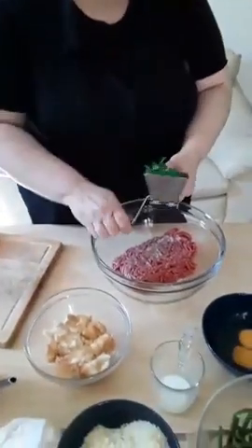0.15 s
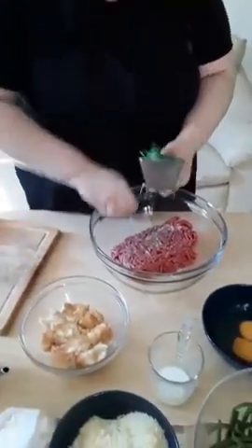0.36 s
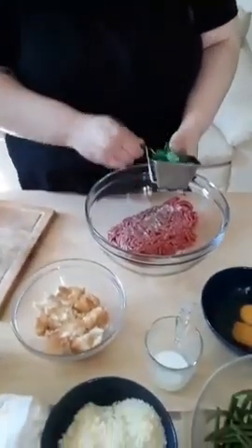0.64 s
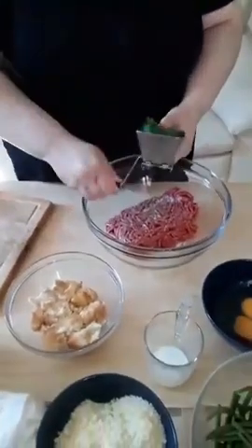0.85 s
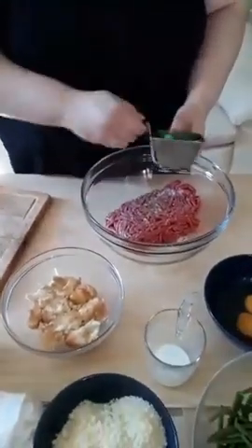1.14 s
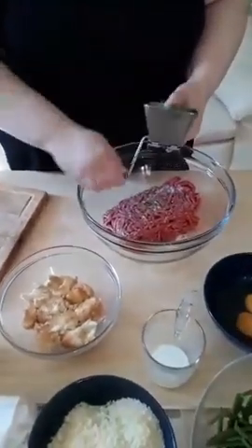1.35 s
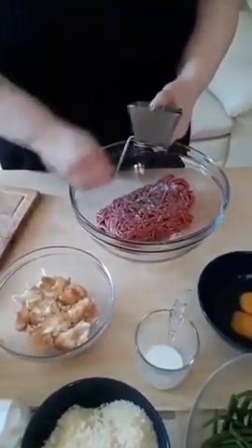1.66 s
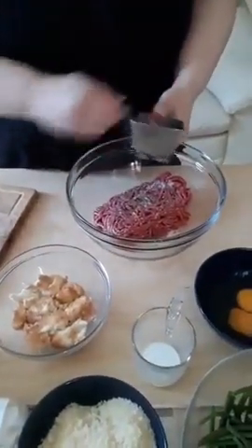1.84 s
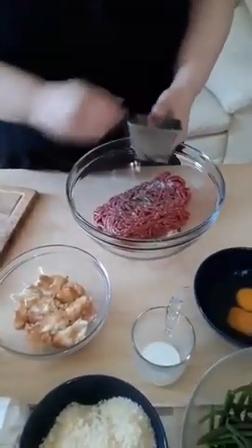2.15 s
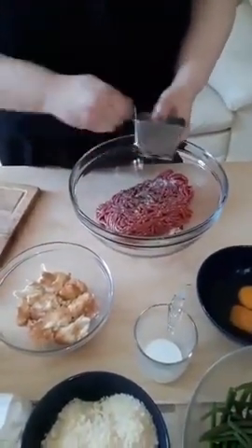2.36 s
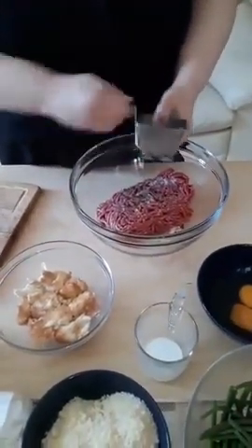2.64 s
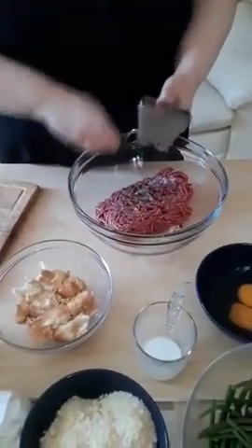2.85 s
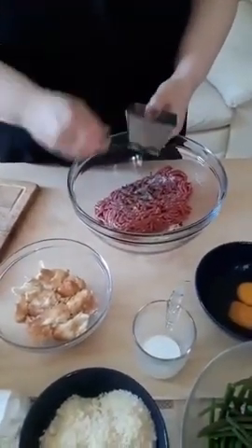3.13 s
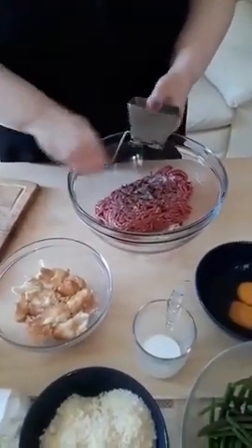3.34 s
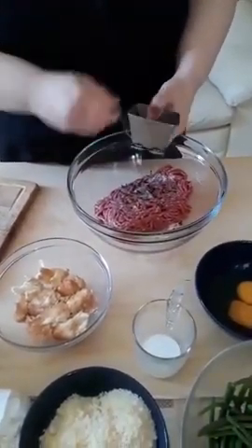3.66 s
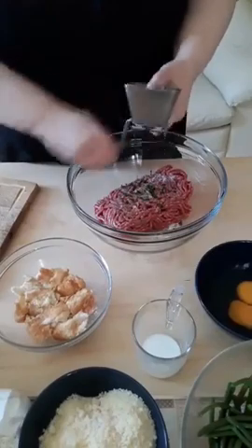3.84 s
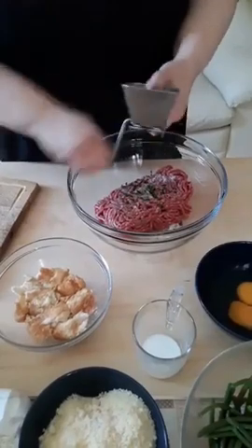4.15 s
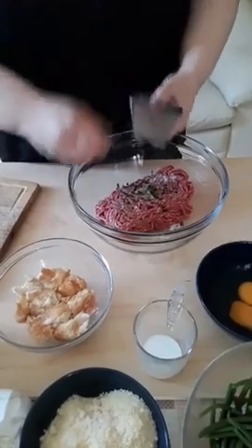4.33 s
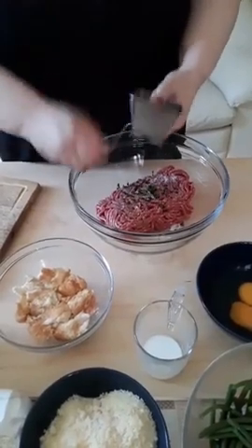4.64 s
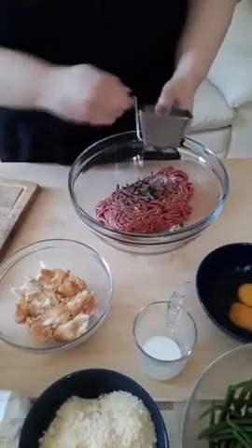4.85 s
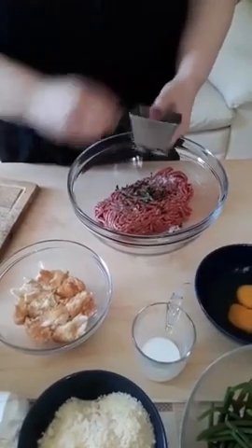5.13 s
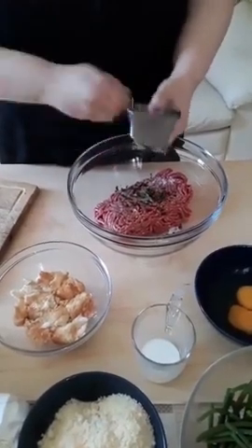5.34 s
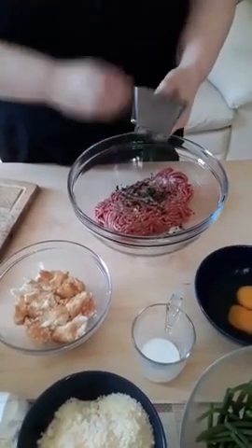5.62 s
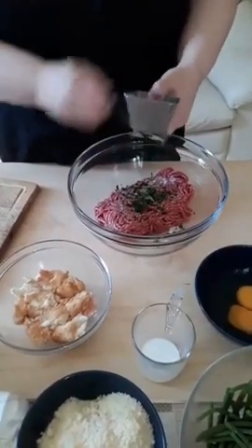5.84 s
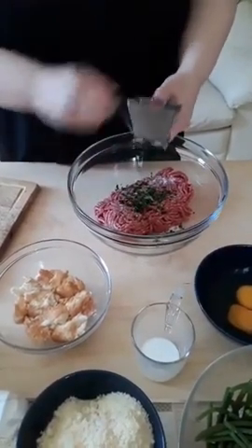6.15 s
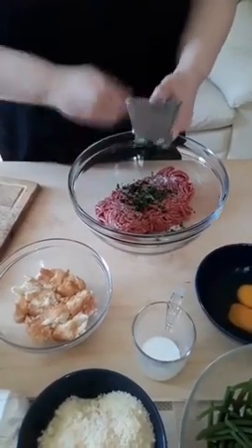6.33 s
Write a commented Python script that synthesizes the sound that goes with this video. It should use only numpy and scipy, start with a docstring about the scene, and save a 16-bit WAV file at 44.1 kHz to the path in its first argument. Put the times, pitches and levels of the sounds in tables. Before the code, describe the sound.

A small steel herb mill is cranked quickly over a glass bowl, tearing wet parsley with a crisp, grainy scrape that pulses with each turn. Stalks snap and the blades click irregularly against the metal, ringing briefly. A few harder knocks make the bowl clunk on the table. The shredding thins near the end. It sounds close, in a slightly echoing kitchen with faint hum and hiss.

```python
"""Wet parsley tears and scrapes in dense grains, over a low rumble of handling: a small steel herb mill
is being cranked above a glass bowl. Its blades catch and knock against the hopper (the cup that holds
the leaves), the steel rings and stalks snap. The heaviest knocks jolt the bowl on the table.
The hard kitchen walls ring after each knock, and a faint hum and hiss lie under it all."""
import sys
import numpy as np
from scipy import signal
from scipy.fft import rfft, irfft, next_fast_len
from scipy.io import wavfile

SR = 44100
rng = np.random.default_rng(int(sys.argv[2]) if len(sys.argv) > 2 else 0)


def inscribe(sig):
    """Save sig as 16-bit PCM at rate SR to the path in sys.argv[1].

    A 1-D sig is mono; a 2-D sig holds one channel per row.
    Samples are clipped to [-1, 1] before scaling.
    """
    pcm = np.round(np.clip(np.atleast_2d(sig).T, -1, 1) * 32767)
    wavfile.write(sys.argv[1], SR, pcm.astype(np.int16))


N = 286164

# Levels in a table are relative to each other. A "colour" says how strong each frequency is.
# how loudly the table booms under the work: t/s, level/dB
TABLE_BOOM = [(0, -54), (1.2, -59), (1.7, -59), (1.93, -53), (2.2, -58), (2.55, -60.5), (2.9, -87),
              (3.4, -63), (6.49, -65.5)]
# colours of that boom and of the rubbing grip: f/Hz, level/dB
BOOM_COLOUR = [(20, -38), (50, -26), (76, -5), (95, -11.5), (120, -3), (136, 2.5), (156, -9.5), (250, -13),
               (400, -22.5), (800, -38), (3000, -63)]
GRIP_COLOUR = [(150, -21), (350, -2), (550, -5), (820, -6), (1100, -9.5), (2000, -24), (6000, -32)]
# colours of the room's hum and hiss: f/Hz, level/dB
HUM_COLOUR = [(20, -18), (40, -9), (58, -6), (76, 1), (98, -8.5), (135, 0.5), (190, -6.5), (380, -6.5),
              (520, -18.5), (1000, -27), (3000, -53)]
HISS_COLOUR = [(120, -16), (200, -14), (1040, -2), (1980, 10.5), (3150, -2), (3690, 1), (5960, -17),
               (8210, -15), (14000, -23)]
# how hard the blades bite into the leaves: t/s, level/dB
BITE = [(0.0, -30), (0.12, -41.5), (0.33, -48), (0.5, -38.5), (0.65, -45), (0.82, -38.5), (1.5, -41.5),
        (2.42, -41.5), (2.58, -46.5), (3.01, -39.5), (3.08, -50), (3.15, -39), (3.4, -42.5), (4.35, -41.5),
        (5.25, -44.5), (5.5, -52), (6.22, -56), (6.49, -44.5)]
# colour of leaves tearing in the hopper: f/Hz, level/dB
LEAF_COLOUR = [(410, -40), (700, -21.5), (1060, -24), (1430, -13), (1640, -11), (1750, -21), (2010, -8.5),
               (2680, -19.5), (2960, -16.5), (3710, -12), (4820, -12.5), (6520, -9), (8170, 2.5),
               (10100, -11.5), (14000, -21)]
# how long the room rings: f/Hz, time to fade by 60 dB/s
ROOM_FADE = [(100, 0.24), (500, 0.68), (2000, 0.69), (5000, 0.69), (8000, 0.47), (14000, 0.37)]
# blades knock in the hopper (the row at 2.007 s is a stalk snapping sharply, with little echo): t/s, crack
# level/dB, wall ring level/dB, blade ring level/dB, blade f/Hz
KNOCKS = [(0.1143, -26.5, -37, -27.5, 7660), (0.3815, -22, -33.5, -18.5, 7250),
          (0.402, -18.5, -31.5, -21, 8340), (0.421, -22.5, -27, -21.5, 7950), (0.9754, -21, -35, -25, 8400),
          (0.9886, -28, -23.5, -19.5, 7500), (1.0461, -16, -24.5, -20, 7850),
          (1.4394, -23, -30.5, -20, 8200), (1.475, -17.5, -28.5, -17.5, 7730), (1.771, -24, -32, -23, 8100),
          (1.7797, -25.5, -25.5, -24, 7300), (1.8005, -27, -42, -35, 7800), (2.0074, -29.5, -48, -33, 7900),
          (2.0624, -26, -33, -20.5, 7600), (2.1074, -15, -25.5, -20, 8000),
          (2.375, -23.5, -31.5, -36, 7950), (2.6418, -17, -22, -12.5, 7750),
          (3.9187, -29.5, -34, -19.5, 7300), (4.2308, -25, -35.5, -18.5, 7240),
          (4.2547, -34.5, -39, -27, 8300), (4.5039, -28, -35, -21, 7360), (4.798, -27.5, -31, -25.5, 7600),
          (5.102, -19, -19, -17, 7920), (5.3385, -27, -28.5, -20.5, 7360), (6.113, -33.5, -36, -32.5, 7700),
          (6.2084, -40, -37, -48, 7800), (6.2699, -35, -48, -24.5, 7970)]
# colour of a knock's crack: f/Hz, level/dB
CRACK_COLOUR = [(60, -29), (500, -21.5), (900, -14.5), (1250, -3), (1700, -2.5), (2550, -1), (3000, 2.5),
                (3300, -0.5), (3750, 2.5), (5200, -1.5), (6500, 4.5), (9500, -1), (11000, -6), (14500, -12)]
# lingering tones of the steel: f/Hz, level/dB, time to fade by 60 dB/s
STEEL_TONES = [(1213, -35.5, 0.66), (1706, -29.5, 0.55), (1845, -44, 0.22), (2017, -21.5, 0.19),
               (3060, -22.5, .2), (3650, -21.5, 0.19), (3820, -34, 0.26), (4900, -20, 0.079),
               (6530, -40, 0.18), (6670, -26.5, 0.16), (7510, -16, 0.12), (8000, -43, 0.23),
               (10485, -45, .22), (13200, -47, 0.5)]
# the thickest stalks snap: t/s, level/dB
THICK_SNAPS = [(0.3602, -32.5), (0.5387, -28), (2.529, -29.5), (3.3565, -29.5), (4.0085, -34), (4.432, -32),
               (4.945, -26.5), (5.58, -39), (5.7836, -39), (5.8436, -41), (5.878, -36.5), (6.359, -36)]
# a wad of leaves drags through the mill's comb: middle t/s, half length/s, level/dB
DRAGS = [(0.373, 0.0093, -35), (0.951, 0.019, -31), (1.203, 0.036, -34.5), (2.869, 0.012, -40.5),
         (3.177, 0.052, -37.5), (3.399, 0.019, -30), (3.541, 0.037, -37), (3.684, 0.038, -38.5),
         (4.667, 0.013, -34), (5.085, 0.0098, -29)]
# the heaviest knocks jolt the mill against the bowl: t/s, thump level/dB, clunk level/dB
JOLTS = [(1.046, -50, -43), (1.475, -36.5, -44), (2.108, -59, -30.5), (2.642, -37.5, -29.5),
         (5.103, -62, -31.5)]
# colours of the table's thump and of the bowl's clunk on it: f/Hz, level/dB
THUMP_COLOUR = [(25, -2), (60, -5), (125, 0), (200, -3), (400, -5.5), (800, -17), (4000, -54)]
CLUNK_COLOUR = [(200, -21.5), (520, -9), (660, 2.5), (830, -12.5), (1020, -0.5), (1210, 10), (1330, -2),
                (1460, -4.5), (2500, 1.5), (6000, -57)]


def from_db(db):
    """Turn decibels into a number to multiply by."""
    return 10 ** (np.asarray(db) / 20)


def unit_power(x):
    """Scale a signal to an average power of 1."""
    return x / np.sqrt(np.mean(x ** 2) + 1e-20)


def burst(x):
    """Give a short sound the energy of 4 ms at power 1."""
    return x / np.sqrt(np.sum(x ** 2) / (.004 * SR))


def in_time(rows):
    """Join (t/s, value) points into a curve with a value at every sample."""
    return np.interp(np.arange(N) / SR, *np.transpose(rows))


def at_hz(points, hz):
    """Read between (f/Hz, value) points, with octaves evenly spaced."""
    known_hz, values = np.transpose(points)
    return np.interp(np.log(np.maximum(hz, 1)), np.log(known_hz), values)


def coloured(x, colour):
    """Filter a sound to give it a colour."""
    size = 2 * next_fast_len(len(x))
    gains = from_db(at_hz(colour, np.arange(size // 2 + 1) * SR / size))
    cepstrum = irfft(np.log(gains))
    # fold it in half, so the filter never rings before the sound arrives (minimum phase)
    cepstrum[1:size // 2] *= 2
    cepstrum[size // 2 + 1:] = 0
    return irfft(rfft(x, size) * np.exp(rfft(cepstrum)))[:len(x)]


def resonance(x, hz, width_hz):
    """Let a sound ring around one frequency; a narrower width rings longer."""
    r = np.exp(-np.pi * width_hz / SR)
    feedback = [1, -2 * r * np.cos(2 * np.pi * hz / SR), r * r]
    return signal.lfilter(np.array([1, 0, -1]) * (1 - r * r) / 2, feedback, x + 1e-18)


def noise(colour):
    """Steady coloured noise of power 1."""
    return unit_power(coloured(rng.standard_normal(N), colour))


def drift(per_s):
    """A random curve of power 1 that heads for a new value per_s times a second."""
    points = rng.standard_normal(N // 10)
    return unit_power(np.interp(np.arange(N) / SR * per_s, np.arange(len(points)), points))


def chatter(rise_s):
    """A rush of tiny impacts that swells and dies within milliseconds."""
    t = np.arange(SR // 20) / SR
    return rng.standard_normal(len(t)) * t / rise_s * np.exp(-t / rise_s)


def add(track, s, sound):
    """Mix a sound into a track, starting s seconds in."""
    start = int(np.clip(round(s * SR), 0, N - 1))
    track[start:start + len(sound)] += sound[:N - start]


def bite_db(turn_s=.2995, first_slack_s=0.004, swing_db=2):
    """The crank turns steadily; the bite of the blades swells and slackens once a turn."""
    turns = (np.arange(N) / SR - first_slack_s) / turn_s
    return in_time(BITE) - swing_db * np.cos(2 * np.pi * turns)


def shredding(level_db, grains_per_s, size_db, clump_db, hiss_db, drag_db):
    """Leaf cells burst in clumps, more often in a hard bite, over the blades' scrape; wads rasp."""
    effort = from_db(bite_db() + level_db)
    pops = rng.random(N) < grains_per_s / SR * np.sqrt(unit_power(effort))
    sizes = from_db(size_db * np.minimum(rng.exponential(1, N), 3)) * rng.choice([-1, 1], N)
    grains = unit_power(pops * sizes) + from_db(hiss_db) * rng.standard_normal(N)
    clumps = unit_power(from_db(clump_db * np.tanh(drift(per_s=190))))
    rasp = from_db(drag_db) * wad_drag() * rng.standard_normal(N)
    return clumps * (effort * unit_power(grains) + rasp)


def hopper(x, wall_db, flutter_db):
    """The leaves sound through the hopper, whose wall answers unevenly as the blades rub it."""
    wall = from_db(wall_db + flutter_db * drift(per_s=25)) * resonance(x, hz=2030, width_hz=150)
    colour_gain = np.linalg.norm(coloured(signal.unit_impulse(SR // 10), LEAF_COLOUR))
    return coloured(x + wall, LEAF_COLOUR) / colour_gain


def wall_scrape(drag_db, turn_db):
    """A wad, or the height of a turn, presses the blades against the hopper wall, which sings roughly."""
    rubbed = resonance(rng.standard_normal(N), hz=2050, width_hz=190)
    rubbed = resonance(rubbed, hz=1960, width_hz=650)
    pressure = from_db(drag_db) * wad_drag() + from_db(turn_db + bite_db())
    return pressure * unit_power(rubbed)


def handling(waver_db, slip_s, slip_db, slip_rise_s, slip_fade_s):
    """The table booms unevenly under the work; the grip rubs along with it and slips once."""
    boom_db = in_time(TABLE_BOOM) + waver_db * drift(per_s=9.2)
    grip = from_db(-63.5 + 0.47 * (boom_db + 63))   # follows about half of the boom's swing in dB
    since = np.arange(N) / SR - slip_s
    slip = np.clip(1 + since / slip_rise_s, 0, 1) * np.exp(-np.maximum(since, 0) / slip_fade_s)
    rub = np.hypot(grip, from_db(slip_db) * slip)
    return from_db(boom_db) * noise(BOOM_COLOUR) + rub * noise(GRIP_COLOUR)


def background(hum_db, hiss_db):
    """The room hums and hisses faintly and steadily."""
    return from_db(hum_db) * noise(HUM_COLOUR) + from_db(hiss_db) * noise(HISS_COLOUR)


def table_echo(x, delay_s, echo_db):
    """The table top throws back one quick echo."""
    return x + from_db(echo_db) * np.pad(x, (int(delay_s * SR), 0))[:N]


def kitchen(x, first_echo_s, build_s):
    """Dense wall echoes build up and fade octave by octave; their pattern changes as the mill moves."""
    out, t, hz = np.zeros(N), np.arange(SR) / SR, np.arange(SR // 2 + 1)
    octave = np.round(np.log2(np.maximum(hz, 125) / 125))
    fades = {k: from_db(-60 * t / at_hz(ROOM_FADE, 125 * 2 ** k)) for k in np.unique(octave)}
    for start in range(0, N, SR // 2):   # a new pattern every half second
        white = rfft(rng.standard_normal(SR))
        tail = sum(irfft(white * (octave == k), SR) * fade for k, fade in fades.items())
        tail *= np.clip((t - first_echo_s) / build_s, 0, 1)
        add(out, start / SR, signal.fftconvolve(x[start:start + SR // 2], tail / np.linalg.norm(tail)))
    return out


def knocks(rise_s, early_s, wall_db, crack_db, blade_db, wall_to_room_db):
    """Each knock cracks and briefly rings the blades and the hand-damped wall; gives (direct, to_room)."""
    direct, to_room = np.zeros(N), np.zeros(N)
    # the thin steel sends little of a crack's bass straight ahead
    bass_cut = signal.butter(2, 1860, "high", fs=SR, output="sos")
    for s, crack, wall, blade, blade_hz in KNOCKS:
        wall_hz = rng.normal(2012, 35)   # the wall's pitch shifts a little with the grip

        def struck(force, wall_gain):
            """Wall, blades and crack all answer the same push."""
            wall_ring = resonance(resonance(force, wall_hz, width_hz=230), wall_hz, width_hz=430)
            blade_ring = resonance(resonance(force, blade_hz, width_hz=1000), blade_hz, width_hz=3400)
            return (wall_gain * from_db(wall + wall_db) * burst(wall_ring)
                    + from_db(blade + blade_db) * burst(blade_ring)
                    + from_db(crack + crack_db) * burst(coloured(force, CRACK_COLOUR)))
        add(direct, s - early_s, struck(signal.sosfilt(bass_cut, chatter(rise_s)), wall_gain=0.96))
        # the wall sounds in all directions, so the more it rings, the more reaches the room
        room_gain = from_db(0.2943 * (wall + 32))
        # the room gathers sound from all sides, which evens the chatter out into a clean click
        click = signal.unit_impulse(SR // 20)
        add(to_room, s, room_gain * struck(click, wall_gain=from_db(wall_to_room_db)))
    return direct, to_room


def steel_ring(level_db, spread_db, nearly_empty_s, empty_boost_db):
    """The steel rings on after a knock, louder for a hard crack and once few leaves are left to damp it."""
    out, t = np.zeros(N), np.arange(SR // 2) / SR
    tones = np.array([from_db(db - 60 * t / fade_s) * np.sin(2 * np.pi * hz * t)
                      for hz, db, fade_s in STEEL_TONES])
    for s, crack, *_ in KNOCKS:
        ring_db = crack + level_db + empty_boost_db * (s > nearly_empty_s)
        strengths = from_db(ring_db + rng.normal(0, spread_db, len(tones)))
        add(out, s, strengths @ tones)
    return out


def stalk_snaps(level_db, rise_s, thin_per_s, thin_db, spread_db):
    """A stalk breaks with one tick; thin ones break at random, louder when the blades bite harder."""
    out = np.zeros(N)
    thin_starts = np.flatnonzero(rng.random(N) < thin_per_s / SR)
    thin_levels = bite_db() + thin_db + spread_db * rng.standard_normal(N)
    thin_snaps = [(i / SR, thin_levels[i]) for i in thin_starts]
    ticks = [burst(chatter(rise_s)) for _ in THICK_SNAPS]
    for k, (s, db) in enumerate(THICK_SNAPS + thin_snaps):
        add(out, s, from_db(db + level_db) * ticks[k % len(ticks)])
    return out


def wad_drag():
    """The drag of each wad of leaves swells and fades as it passes the comb."""
    t = np.arange(N) / SR
    return sum(from_db(db) * np.exp(-2 * ((t - s) / half_s) ** 2) for s, half_s, db in DRAGS)


def bowl_jolts(thump_to_room_db, clunk_to_room_db):
    """The jolted bowl clunks and the table under it thumps; gives (direct, to_room)."""
    direct, to_room, click = np.zeros(N), np.zeros(N), signal.unit_impulse(SR // 10)
    thump = burst(coloured(resonance(click, hz=135, width_hz=430), THUMP_COLOUR))
    clunk = burst(coloured(click, CLUNK_COLOUR))
    for s, thump_db, clunk_db in JOLTS:
        add(direct, s, from_db(thump_db) * thump + from_db(clunk_db) * clunk)
        add(to_room, s, from_db(thump_db + thump_to_room_db) * thump)
        add(to_room, s, from_db(clunk_db + clunk_to_room_db) * clunk)
    return direct, to_room


def scene():
    """Mix the mill, its echoes and the quiet background into one channel."""
    hits, hits_to_room = knocks(rise_s=0.0012, early_s=0.00018, wall_db=2.0, crack_db=0.62,
                                blade_db=-2.5, wall_to_room_db=-4)
    jolts, jolts_to_room = bowl_jolts(thump_to_room_db=-6.5, clunk_to_room_db=4)
    tearing = shredding(level_db=-0.8, grains_per_s=1700, size_db=3.5, clump_db=5.5,
                        hiss_db=-7.5, drag_db=1.9)
    snaps = stalk_snaps(level_db=-1.3, rise_s=0.0013, thin_per_s=6, thin_db=4.5, spread_db=2)
    leaves = hopper(tearing + snaps, wall_db=-8, flutter_db=2.5)
    leaves += wall_scrape(drag_db=-17.5, turn_db=-23.5)
    to_room = from_db(-0.86) * hits_to_room + jolts_to_room + from_db(-1.73) * leaves
    room = kitchen(to_room, first_echo_s=0.0028, build_s=0.005)
    direct = table_echo(hits + jolts + leaves, delay_s=.0021, echo_db=-9.5)
    ring = steel_ring(level_db=3.5, spread_db=2.0, nearly_empty_s=5.0, empty_boost_db=4)
    hum_and_hiss = background(hum_db=-64.5, hiss_db=-58.5)
    rumble = handling(waver_db=2, slip_s=0.792, slip_db=-47.5, slip_rise_s=0.057, slip_fade_s=0.094)
    return (direct + ring + room + rumble + hum_and_hiss)[None]


def record(dry):
    """Round off the tallest peaks and cut the treble above 14330 Hz."""
    rounded = 1.2 * np.tanh(dry / 1.2)
    treble_cut = signal.ellip(12, .1, 90, 14330, fs=SR, output="sos")
    return signal.sosfilt(treble_cut, rounded)


dry = scene()
out = record(dry)
inscribe(out)
```